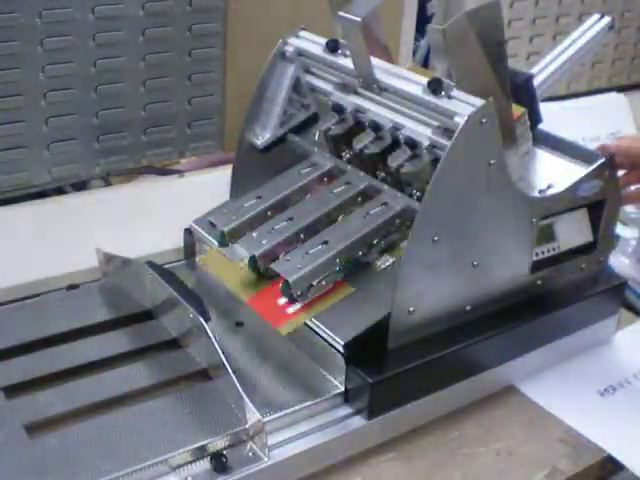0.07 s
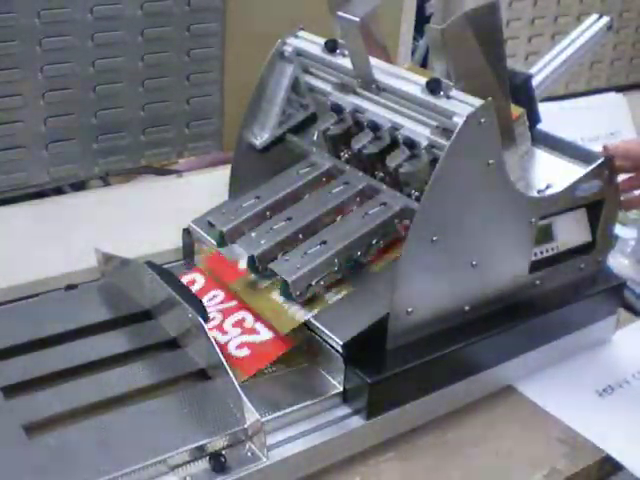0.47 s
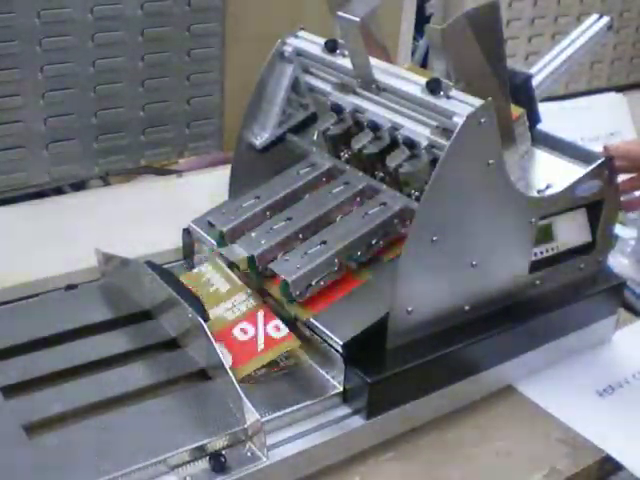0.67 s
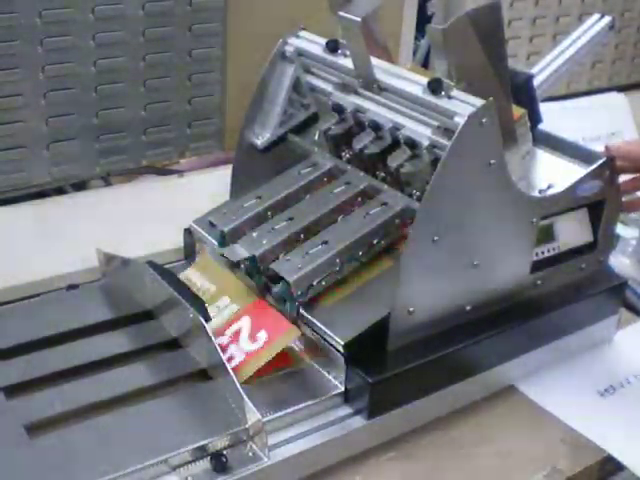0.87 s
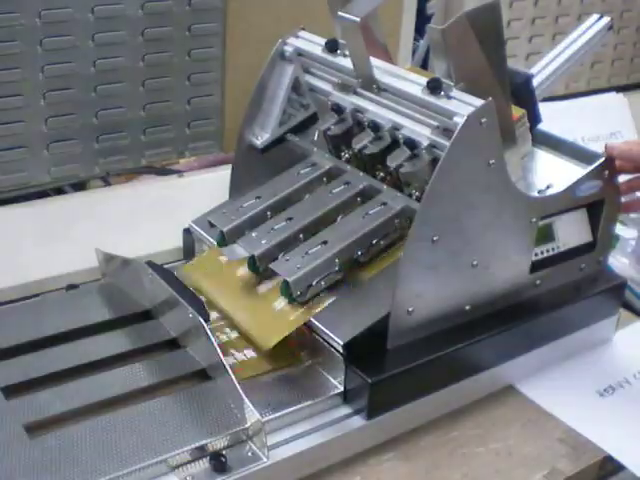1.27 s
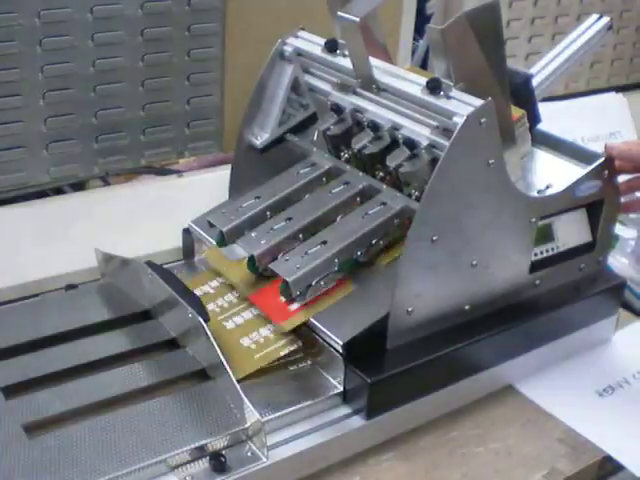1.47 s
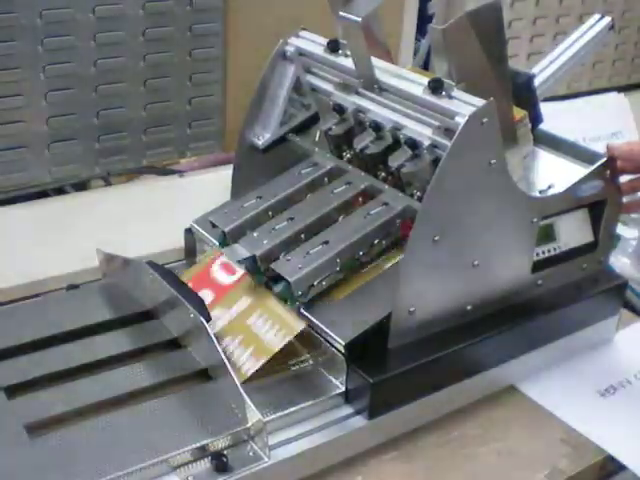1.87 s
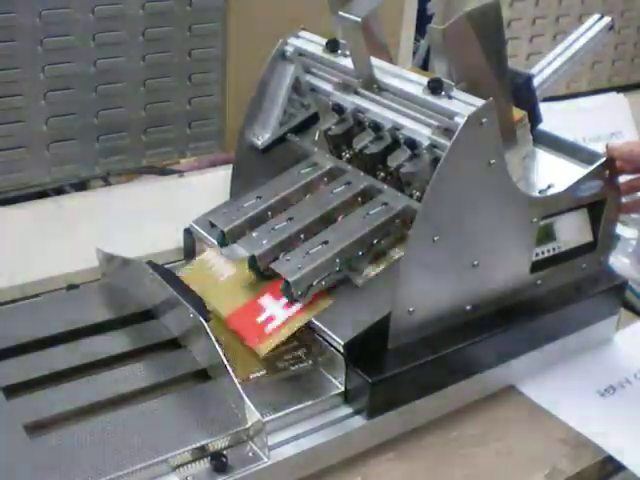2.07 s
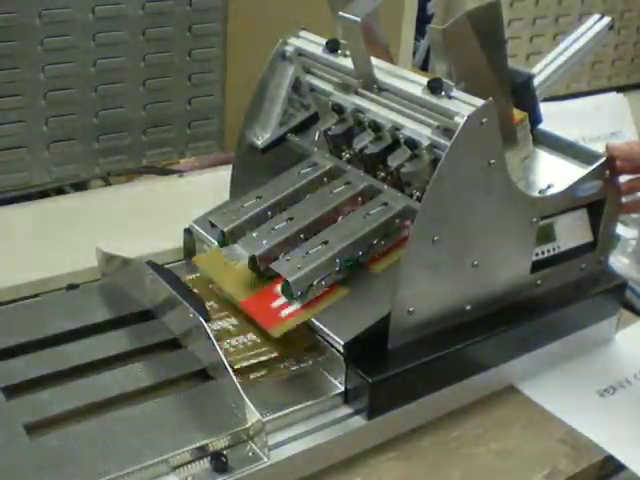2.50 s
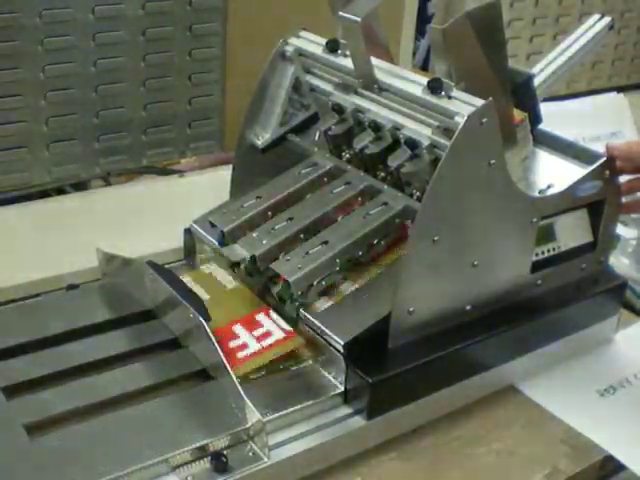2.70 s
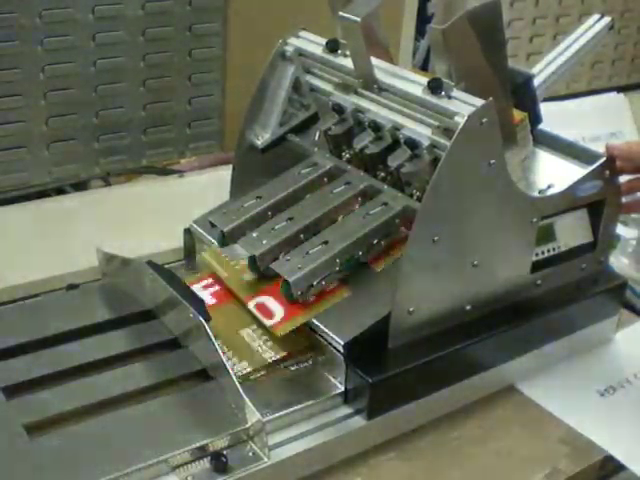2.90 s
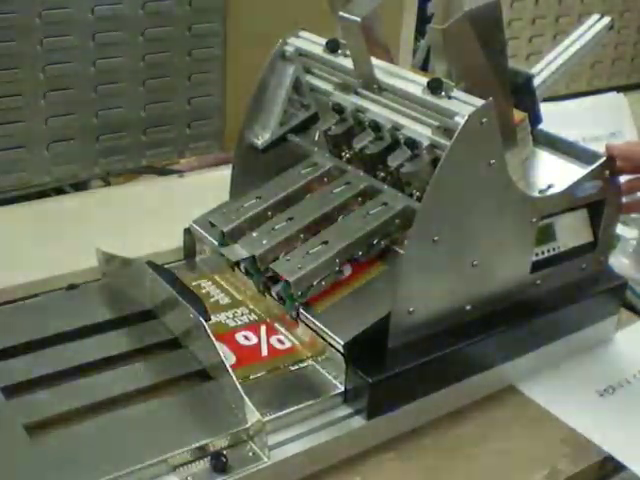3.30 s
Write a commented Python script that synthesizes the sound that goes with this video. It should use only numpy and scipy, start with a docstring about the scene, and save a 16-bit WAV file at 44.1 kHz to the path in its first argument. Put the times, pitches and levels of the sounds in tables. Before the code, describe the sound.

A card feeding machine starts up and shoots cards into a steel tray with fast, even, slightly ringing clacks. Its motor hums and rollers rattle underneath, then it runs down after a last clack in a small workshop.

```python
"""In a small workshop, a friction feeder shoots cards into a steel tray, about nine a second.
Each impact excites damped resonances: the card snaps against the stop, slaps onto the pile and sets
the steel ringing in its natural modes. Beneath it, motor, belts and rollers rumble and hiss in forced
vibration. Little reaches far above 4 kHz but brief bright bursts of treble splatter, strongest on
the hardest hits, where the microphone also overloads."""
import sys
import numpy as np
from scipy import signal
from scipy.fft import rfft, irfft, next_fast_len
from scipy.io import wavfile
from scipy.ndimage import map_coordinates

SR = 44100
rng = np.random.default_rng(int(sys.argv[2]) if len(sys.argv) > 2 else 0)


def wav_record(signal):
    """Record a signal, one row per channel, as 16-bit PCM in the file named by sys.argv[1]."""
    frames = np.transpose(np.atleast_2d(signal))
    bounded = np.clip(frames, -1, 1)
    # unit amplitude maps onto the largest positive 16-bit level
    quanta = np.round(bounded * 32767).astype(np.int16)
    wavfile.write(sys.argv[1], SR, quanta)


N = 152145
SNAP_RISE_S, CLANK_RISE_S, SLAP_RISE_S, SLAP_T60_S = 0.00063, 0.0004, 0.0022, 0.14
BODY_HZ, BODY_STOP_HZ = 4055, 4700
PITCH_SCATTER = 0.01506  # share by which the resonances shift with the spot that is struck

def amp(db):
    """Decibels to amplitude ratio."""
    return 10 ** (np.asarray(db) / 20)

def filtered(x, response):
    """Linear filtering: the spectrum of x times a frequency response."""
    size = next_fast_len(N + SR // 2)
    return irfft(rfft(x, size) * response(np.fft.rfftfreq(size, 1 / SR)), size)[:N]

def noise(spectrum):
    """Spectral shaping: noise of rms 1, coloured by (Hz, dB) points."""
    points_hz, db = np.transpose(spectrum)
    colour = lambda hz: amp(np.interp(np.log(hz + 1), np.log(points_hz + 1), db))
    x = filtered(rng.standard_normal(N), colour)
    return x / np.sqrt(np.mean(x ** 2) + 1e-20)

def wobble(rate):
    """Random modulation: a smooth curve through rate knots a second."""
    return map_coordinates(rng.standard_normal(int(N * rate / SR) + 4), [np.arange(N) * rate / SR])

def add(track, start, sound):
    """Superposition: a sound joins the track at start seconds."""
    part = track[max(round(start * SR), 0):][:len(sound)]
    part += sound[:len(part)]

def blows(starts, levels_db, spectrum, rise, t60, contact=0):
    """Dense modes answer a blow like noise that rises, holds during contact, then decays (times in s)."""
    out, t, grain = np.zeros(N), np.arange(SR // 5) / SR, noise(spectrum)
    for k, (start, db, hold, decay) in enumerate(np.broadcast(starts, levels_db, contact, t60)):
        envelope = (1 - np.exp(-t / rise)) * amp(-60 * np.maximum(t - hold, 0) / decay)
        tuning = 1 + PITCH_SCATTER * rng.standard_normal()
        position = k * (N // len(starts)) + t * SR * tuning
        blow = envelope * np.interp(position % N, np.arange(N), grain)
        add(out, start, amp(db) * blow * np.linalg.norm(envelope) / np.linalg.norm(blow))
    return out

def noise_floor():
    """Stationary noise: a faint, low background."""
    return amp(-42) * noise([(20, -3.5), (70, -2), (140, -3), (200, -11), (600, -19.5), (4200, -32.5)])

def reverberation(x, strikes, build_s=0.001, t60=0.2):
    """Convolution with the workshop's short impulse response, different for each spot struck."""
    out, t = np.zeros(N), np.arange(SR // 2) / SR
    envelope = (1 - np.exp(-t / build_s)) * amp(-60 * t / t60)
    edges = [0] + [round(start * SR) for start in strikes] + [N]
    for begin, end in zip(edges, edges[1:]):
        tail = envelope * rng.standard_normal(len(t))
        add(out, begin / SR, signal.fftconvolve(x[begin:end], tail / np.linalg.norm(tail)))
    return out

# Running levels. Each row: time in seconds, then relative motor, roller and belt levels in dB.
DRIVE_LEVELS = [(0,-46.5,-46.5,-39.5), (.14,-39.5,-39.5,-31), (0.281,-30.5,-31.5,-30.5),
                (0.501,-31,-27,-33), (0.748,-31.5,-25,-33), (1.3,-31,-28,-36), (1.55,-31,-25.5,-37),
                (1.95,-28.5,-25.5,-41.5), (2.25,-32,-28,-33), (2.68,-31,-26,-43), (2.849,-36,-28.5,-41.5),
                (2.959,-37.5,-37,-40), (3.1,-38.5,-44,-45), (3.172,-34,-28.5,-33), (3.261,-51.5,-51,-61),
                (3.45,-59.5,-70,-73)]
# Spectra of the three parts. Each row: frequency in Hz, relative level in dB.
MOTOR_SPECTRUM = [(20, -14.5), (38, -9), (58, -24.5), (76, -9.5), (88, 3), (103, -15.5), (140, -4),
                  (186, 0), (248, -0.5), (305, -12), (600, -25.5)]
ROLLER_SPECTRUM = [(150, -13.5), (310, -18), (365, -5), (415, -8), (480, -0.5), (535, -2.5), (572, 0.5),
                   (625, -2), (685, 2), (745, -11), (805, -5), (920, -16), (1050, -9.5), (1400, -19),
                   (4000, -28.5)]
BELT_SPECTRUM = [(300, -18.5), (1050, 15.5), (1500, -13), (2400, -6.5), (3600, 5), (4200, -10)]
def drive():
    """Forced vibration: the motor rumbles, rollers rattle and belts hiss, swelling, then running down."""
    times, *levels = np.transpose(DRIVE_LEVELS)
    motor_db, roller_db, belt_db = [np.interp(np.arange(N) / SR, times, db) for db in levels]
    motor = amp(motor_db + 3) * noise(MOTOR_SPECTRUM)
    rollers = amp(roller_db + 1 + 0.67 * wobble(60)) * noise(ROLLER_SPECTRUM)
    belts = amp(belt_db - 6 + 0.54 * wobble(270)) * noise(BELT_SPECTRUM)
    return motor + rollers + belts

# Soft bumps of the rollers. Each row: time in seconds, level in dB.
ROLLER_BUMPS = [(0.166, -32), (.234, -20.5), (0.576, -22), (0.666, -18), (0.972, -20), (2.793, -19),
                (2.857, -26.5), (2.918, -22.5), (3.054, -24.5), (3.162, -27.5)]
def roller_bumps(centre_hz=212.2, rise_s=0.0083):
    """Damped oscillation: each bump is a low tone that swells and dies within a few cycles."""
    out, t = np.zeros(N), np.arange(SR // 5) / SR
    envelope = (t / rise_s / 2) ** 2 * np.exp(2 - t / rise_s)
    for time, db in ROLLER_BUMPS:
        hz = centre_hz * (1 + 0.069 * rng.standard_normal())
        add(out, time - rise_s, amp(db) * envelope * np.sin(2 * np.pi * hz * t))
    return out

# Cards passing the rollers. Each row: start in seconds, level in dB.
ROLLER_KNOCKS = [(.308, -19), (.612, -14.5), (1.575, -15), (1.958, -16), (2.675, -15.5)]
def roller_knocks():
    """Impact excitation: a card pulled through the rollers gives a dull knock."""
    starts, db = np.transpose(ROLLER_KNOCKS)
    return blows(starts, db, ROLLER_SPECTRUM, rise=0.0028, t60=0.087)

# Cards sliding out. Each row: centre time in seconds, half-width in seconds, level in dB.
CARD_SLIDES = [(2.897, 0.014, -29), (3.061, .02, -34), (3.17, 0.003, -25)]
def card_slides():
    """Sliding friction: a card rubs under the rollers in a brief swell of noise."""
    t = np.arange(N) / SR
    rub = noise([(800, 4), (1600, 7.0), (2300, 10.5), (3200, 0.5), (4200, -6.5)])
    return rub * sum(amp(db) * np.exp(-((t - centre) / width) ** 2) for centre, width, db in CARD_SLIDES)

# Ticks in the feed. Each row: start in seconds, relative level in dB.
FEED_TICKS = [(0.0536, -21.5), (0.057, -16.5), (0.594, -13), (0.3041, -20.5), (1.7363, -14.5), (1.84, -21),
              (1.9583, -13.5), (2.165, -13), (2.2922, -17.5), (2.5253, -15), (2.6158, -13.5), (2.667, -16)]
# Spectrum of a light touch. Each row: frequency in Hz, relative level in dB.
TOUCH_SPECTRUM = [(300, -12), (1200, -0.5), (2400, -9.5), (3700, -0.5), (4200, -14)]
def feed_ticks():
    """Heavy damping: light impacts of the feed gate and card edges die away as ticks."""
    starts, db = np.transpose(FEED_TICKS)
    return blows(starts, db - 0.5, TOUCH_SPECTRUM, rise=SNAP_RISE_S, t60=0.017)

def edge_rattle(starts, clank_db, bounces=6, span_s=0.05, fade_db_per_s=205):
    """Rebound: a settling card's edges touch down a few more times, louder after a hard clank."""
    lag = span_s * rng.random((len(starts), bounces))
    db = clank_db[:, None] - 0.5 - fade_db_per_s * lag + 5.5 * rng.standard_normal(lag.shape)
    touches = starts[:, None] + lag
    return blows(touches.ravel(), db.ravel(), TOUCH_SPECTRUM, rise=SNAP_RISE_S, t60=0.012)

# Modes of the steel tray. Each row: frequency in Hz, relative level in dB, 60 dB decay time in seconds.
TRAY_MODES = [(1306.4, -3, 0.16), (1503, -4, 0.19), (1663.4, 1, 0.21), (1788, -5.5, 0.071),
              (2414, -9, 0.28), (3074, -4, 0.23), (3480, -5, 0.13), (4044, -8, 0.15), (3960, -5, 0.16)]
def steel_ring(starts, clank_db, guide_db, guide_hz=2020.5, guide_t60=0.36, scatter_db=5.5):
    """Free vibration: each card excites a new mix of tray modes, and a guide adds one longer note."""
    out, t = np.zeros(N), np.arange(SR // 2) / SR
    hz, db, t60 = np.transpose(TRAY_MODES)[:, :, None]
    modes = amp(db - 60 * t / t60) * np.exp(2j * np.pi * hz * t)
    attack = 1 - np.exp(-t / CLANK_RISE_S)
    for start, strike_db, note_db in zip(starts, clank_db, guide_db):
        weights = amp(scatter_db * rng.standard_normal(len(hz)))
        phases = np.exp(2j * np.pi * rng.random(len(hz)))
        tray = amp(strike_db - 9.5) * ((weights * phases) @ modes).imag
        guide = amp(note_db - 60 * t / guide_t60) * np.sin(2 * np.pi * (guide_hz * t + rng.random()))
        add(out, start, (tray + guide) * attack)
    return out

def treble_splatter(starts, splatter_db, slap_db, contact):
    """Broadband transients: a bright burst, strongest on the hardest hits, then a faint, short hiss."""
    burst_spectrum, hiss_spectrum = [(4500, 4), (10000, -4), (16000, -12)], [(4500, 4), (9000, -30)]
    burst = blows(starts, splatter_db, burst_spectrum, rise=SNAP_RISE_S, t60=0.0019, contact=contact)
    hiss = blows(starts, slap_db - 33, hiss_spectrum, rise=SLAP_RISE_S, t60=SLAP_T60_S, contact=contact)
    return burst + hiss

# Spectra of the stop, tray and pile when struck. Each row: frequency in Hz, relative level in dB.
STOP_SPECTRUM = [(300, -28.5), (1200, -33), (2100, -4.5), (2550, -1), (2870, 6), (2980, -3), (3100, 10.5),
                 (3220, 6), (3330, -4), (3480, 3.5), (3620, -3.5), (4100, -7.5)]
TRAY_SPECTRUM = [(400, -20), (1000, -7.5), (1200, -9.5), (1340, -3.5), (1560, -4), (1660, -7.5), (1740, -1),
                 (1820, 0.5), (1950, -16.5), (2400, -17), (4000, -12.5)]
PILE_SPECTRUM = [(100, -28), (240, 1), (310, -20), (470, -9), (535, 2), (572, 0.5), (630, -1.5),
                 (690, -7.5), (750, -7.5), (845, -5.5), (930, -12.5), (2000, -16.5)]
def card_impacts(starts, snap_db, clank_db, slap_db, contact, snap_t60, lead_s=0.0031):
    """Impact sound: a card brushes the guide, snaps on the stop, clanks the tray and slaps the pile."""
    brush = blows(starts - lead_s, slap_db - 4, TOUCH_SPECTRUM, rise=0.0034, t60=0.0067, contact=lead_s)
    snap = blows(starts, snap_db - 5.5, STOP_SPECTRUM, rise=SNAP_RISE_S, t60=snap_t60, contact=contact)
    clank = blows(starts, clank_db + 2, TRAY_SPECTRUM, rise=CLANK_RISE_S, t60=0.11, contact=contact)
    slap = blows(starts, slap_db, PILE_SPECTRUM, rise=SLAP_RISE_S, t60=SLAP_T60_S, contact=contact)
    return brush + snap + clank + slap

def low_pass(x, order=27.3):
    """Band limiting: a steep Butterworth slope keeps the band below about 4 kHz."""
    return filtered(x, lambda hz: (hz < BODY_STOP_HZ) / np.sqrt(1 + (hz / BODY_HZ) ** (2 * order)))

# Cards hitting the stop. Each row: start in seconds, relative snap, clank and slap levels in dB,
# contact time and the snap's 60 dB decay time in seconds, relative splatter and guide levels in dB.
STRIKES = [(0.3292,-0.5,-14.5,-20,0.0066,0.03,-19.5,-34), (0.463,2.5,-15,-20,0.003,.04,-7.5,-26),
           (0.5814,-15.5,-20,-12.5,0.0022,.09,-42,-35), (0.6888,3,-15.5,-14,0.0038,0.029,-13.5,-20),
           (0.7976,0,-16.5,-23.5,0.004,0.029,-14.5,-23.5), (0.9126,-6,-18.5,-12.5,0.0045,0.02,-35,-29),
           (1.0197,-2.5,-16,-15.5,0.0059,0.07,-36,-23), (1.1376,-10.5,-18,-13.5,0.0016,0.083,-67.5,-26.5),
           (1.223,1,-13,-24,0.00069,0.021,-9.5,-28), (1.337,-12.5,-22.5,-11.5,0.001,0.044,-70,-38),
           (1.4479,-6.5,-14.5,-15,0.0064,0.03,-27.5,-29), (1.5593,-4,-21,-13.5,0.0016,0.022,-57,-29.5),
           (1.67,2,-14,-14,0.0045,0.029,-16.5,-20.5), (1.7848,-10.5,-13.5,-20,0.0014,0.11,-75,-27.5),
           (1.8984,-7.5,-17,-14.5,0.0023,0.037,-53,-28.5), (2.0137,0,-23,-13,0.0022,0.029,-21.5,-23.5),
           (2.125,-11,-20.5,-13,0.006,.065,-56,-32), (2.241,-1.5,-18,-18,0.0034,0.018,-21.5,-27.5),
           (2.3531,-3.5,-17,-17.5,0.0038,0.034,-30.5,-24.5), (2.4645,-1.5,-16.5,-19.5,0.0039,0.045,-18,-34),
           (2.5784,-11,-20,-16,0.0015,0.075,-77,-41), (2.69,-2,-18,-15.5,0.0021,0.062,-28.5,-22.5),
           (2.8089,-4.5,-15.5,-22.5,0.0077,0.034,-26.5,-30), (2.9727,-5.5,-16,-16.5,0.0032,0.019,-55,-32),
           (3.175,-3.5,-26.5,-29,0.00077,0.013,-57,-37.5)]
def scene():
    """Superposition: the feeder and room, held below about 4 kHz, with treble splatter and hiss on the hits."""
    starts, snap_db, clank_db, slap_db, contact, snap_t60, splatter_db, guide_db = np.transpose(STRIKES)
    hits = card_impacts(starts, snap_db, clank_db, slap_db, contact, snap_t60)
    hits += edge_rattle(starts, clank_db)
    hits += roller_knocks() + feed_ticks() + card_slides() + roller_bumps()
    body = hits + amp(-10) * reverberation(hits, starts)
    body += steel_ring(starts, clank_db, guide_db) + drive() + noise_floor()
    return (low_pass(body) + treble_splatter(starts, splatter_db, slap_db, contact))[None]

def record(dry, clip_level=0.68, treble_db=-9, top_hz=16600):
    """Saturation: the microphone clips the hardest snaps; a shelf and a band limit subdue the treble."""
    clipped = np.clip(dry[0], -clip_level, clip_level)
    shelf = lambda hz: amp(np.interp(hz, [BODY_HZ, BODY_STOP_HZ], [0, treble_db]))
    return filtered(clipped, lambda hz: shelf(hz) * (hz < top_hz))[None]

dry = scene()
out = record(dry)
wav_record(out)
```